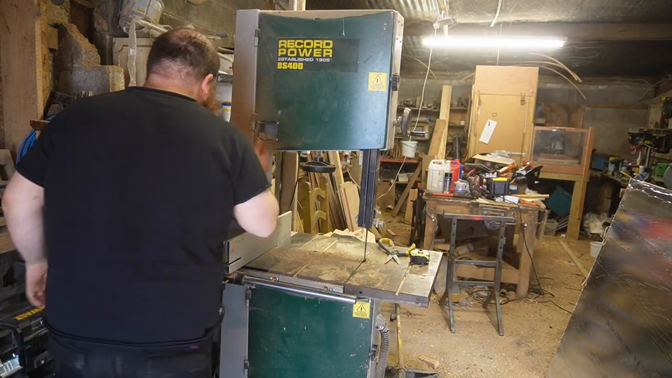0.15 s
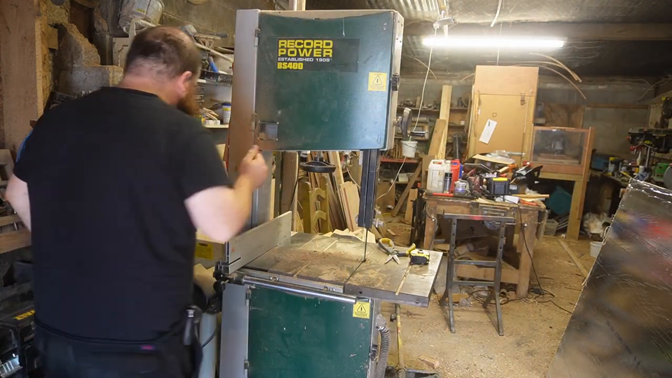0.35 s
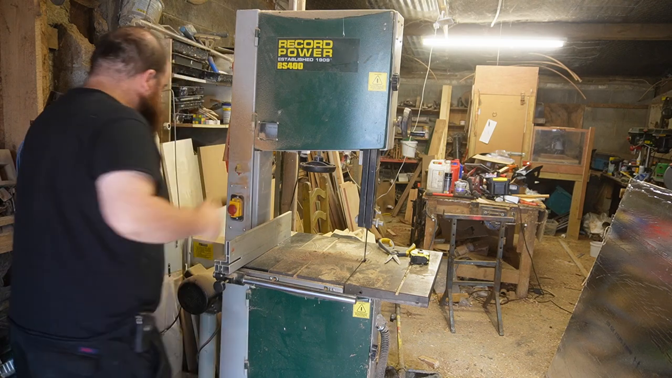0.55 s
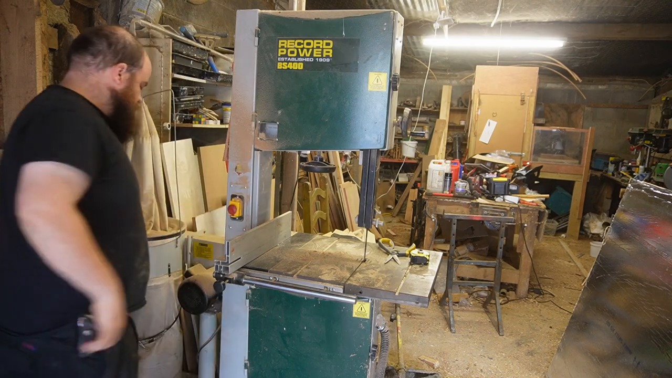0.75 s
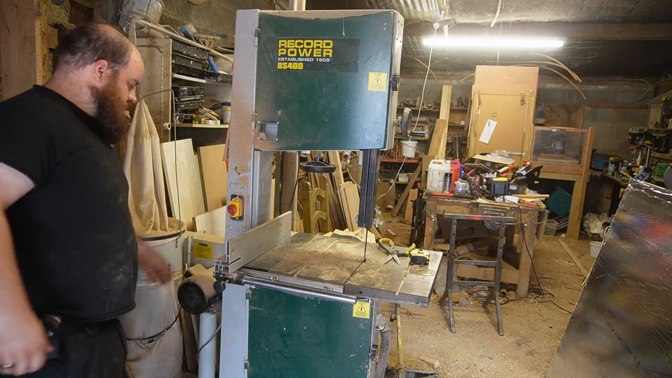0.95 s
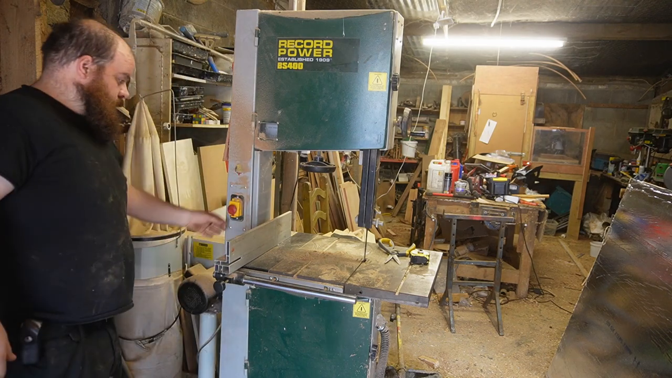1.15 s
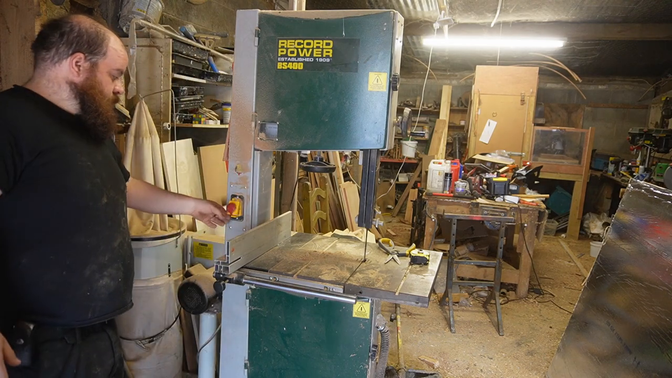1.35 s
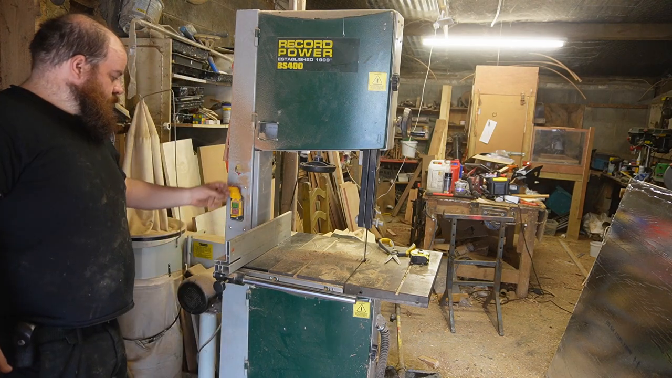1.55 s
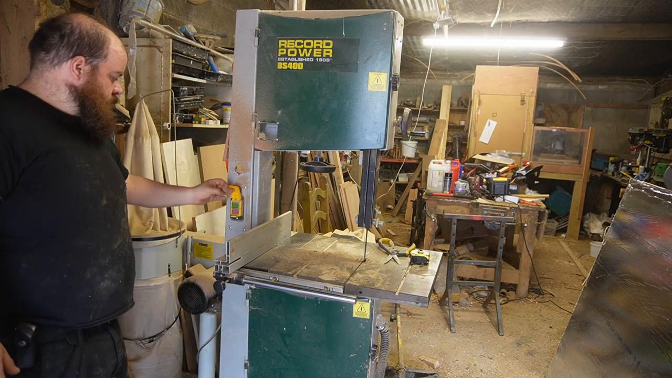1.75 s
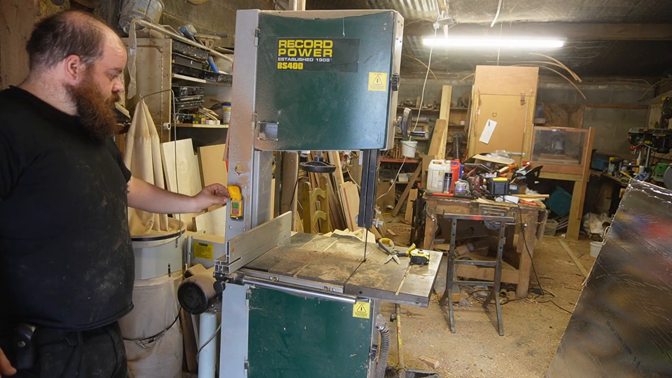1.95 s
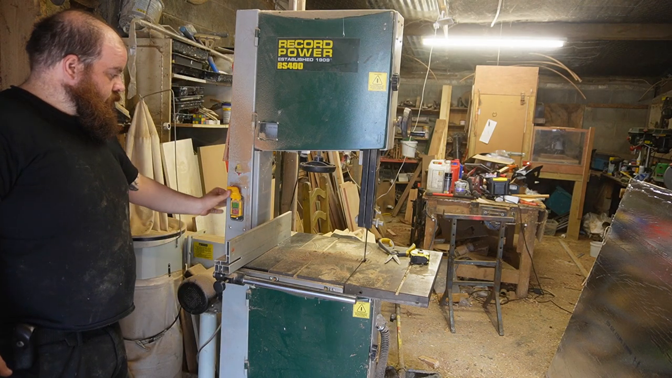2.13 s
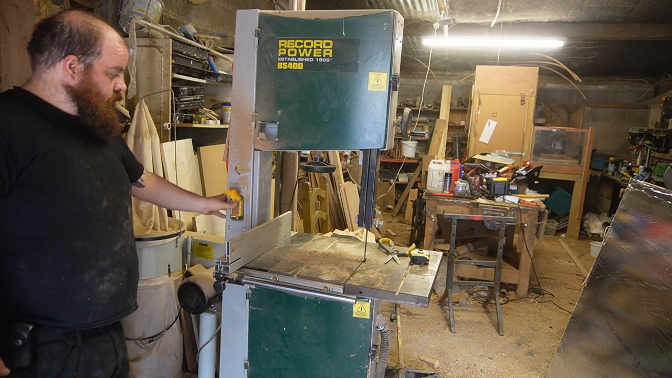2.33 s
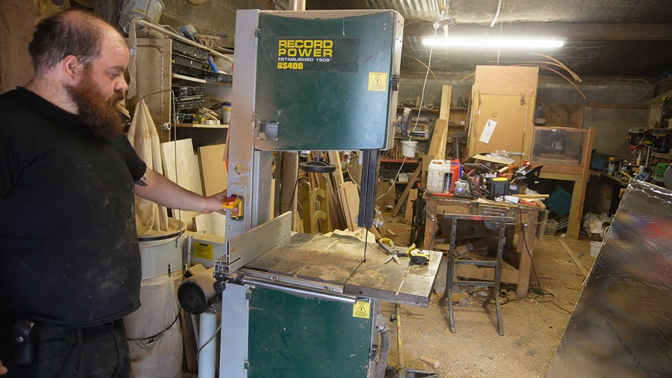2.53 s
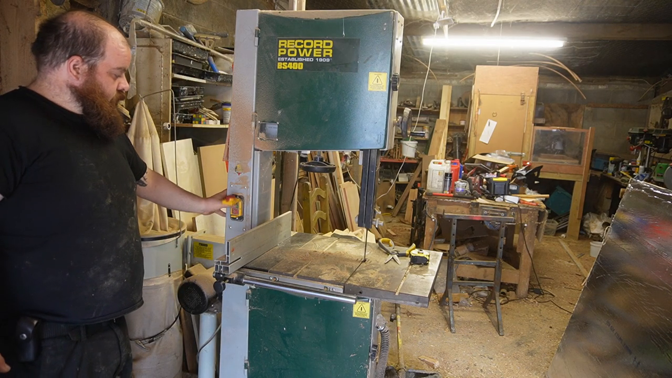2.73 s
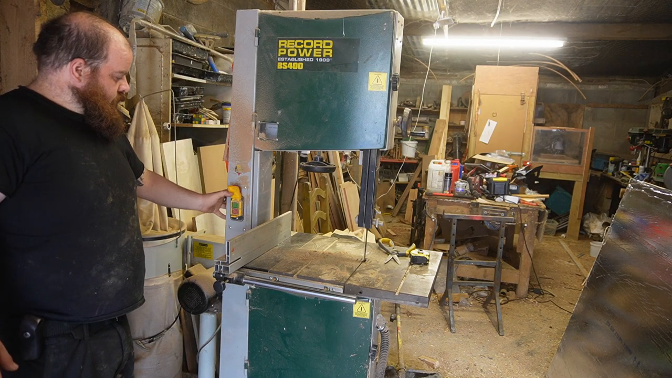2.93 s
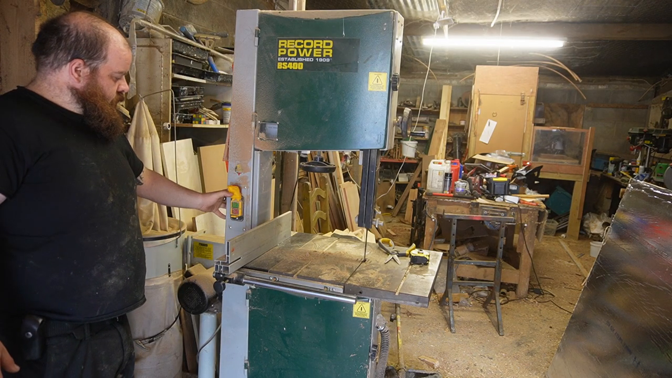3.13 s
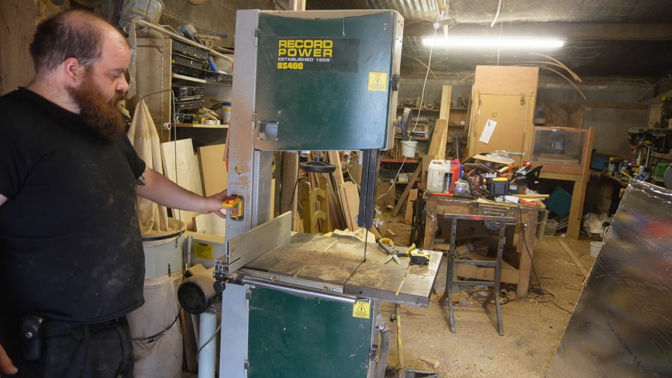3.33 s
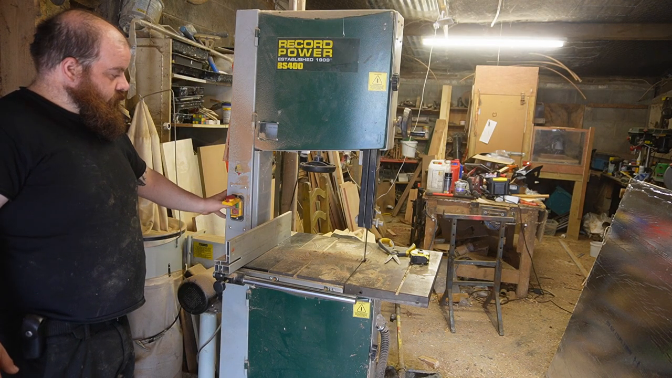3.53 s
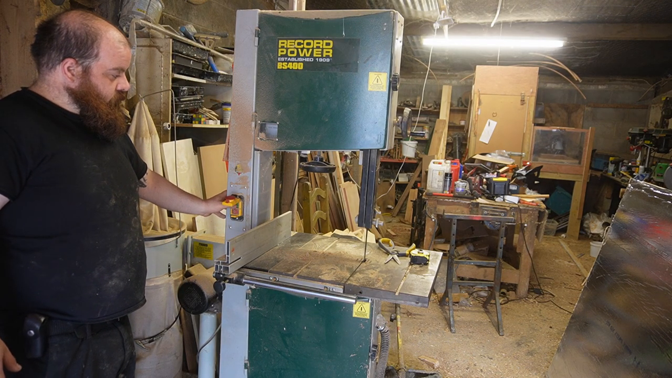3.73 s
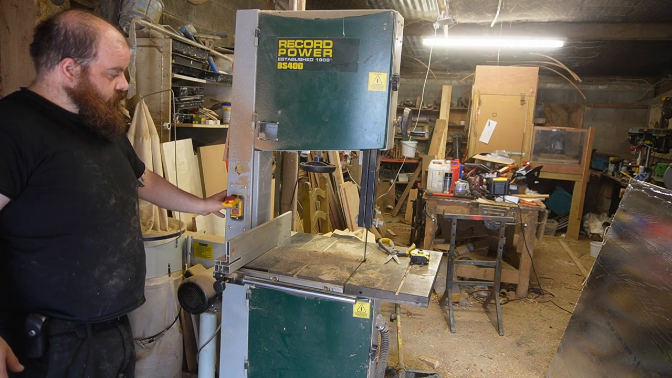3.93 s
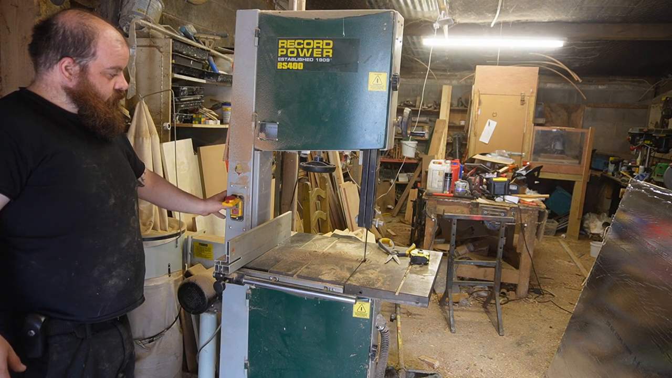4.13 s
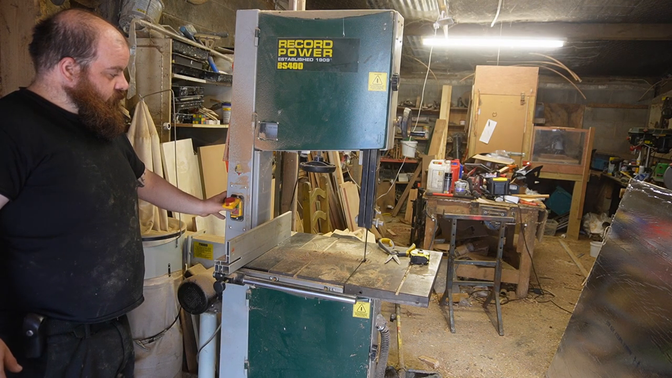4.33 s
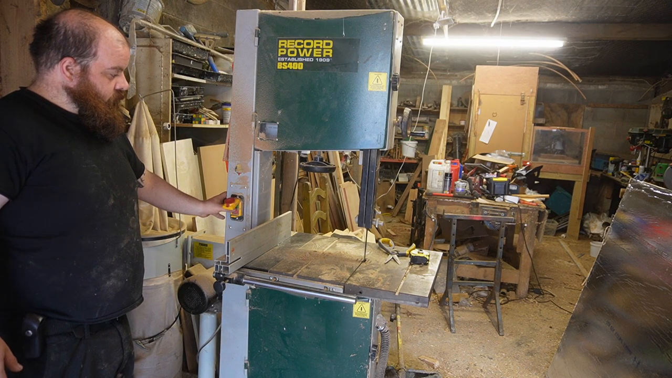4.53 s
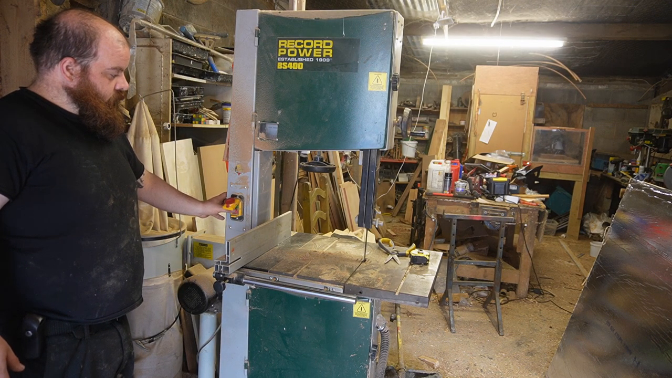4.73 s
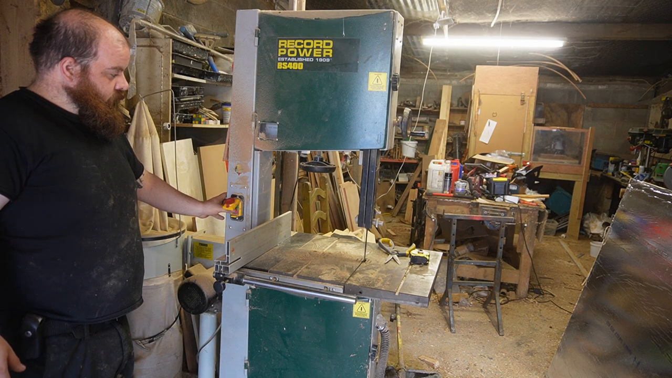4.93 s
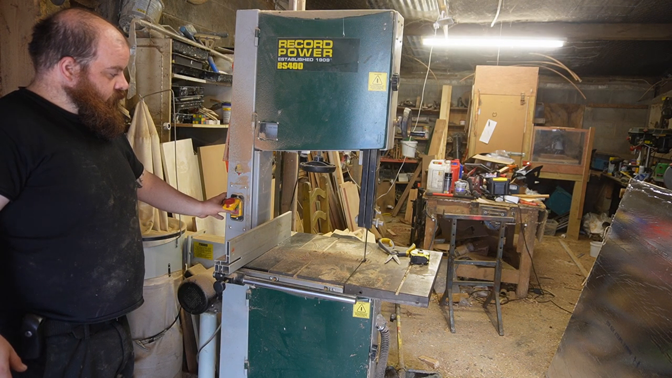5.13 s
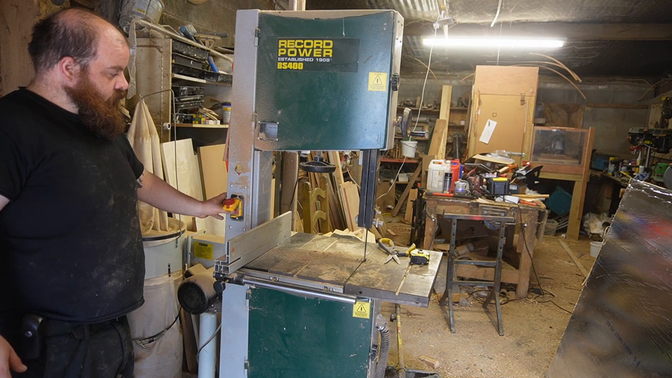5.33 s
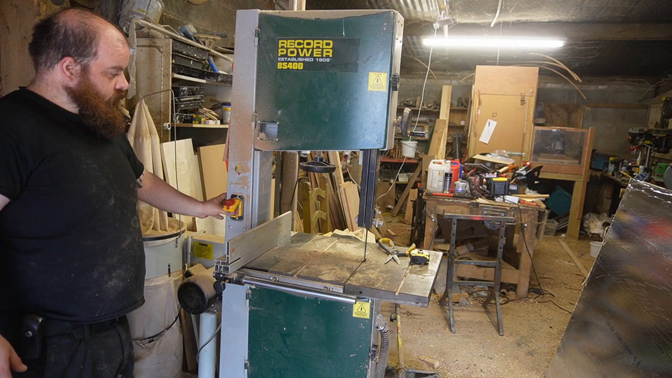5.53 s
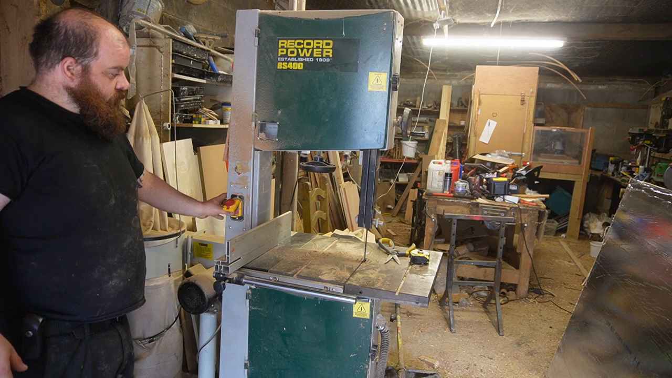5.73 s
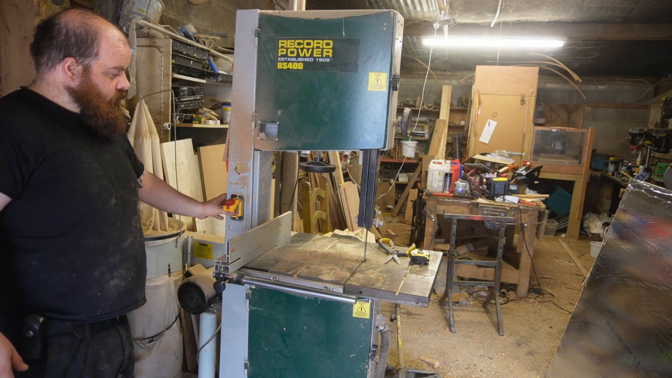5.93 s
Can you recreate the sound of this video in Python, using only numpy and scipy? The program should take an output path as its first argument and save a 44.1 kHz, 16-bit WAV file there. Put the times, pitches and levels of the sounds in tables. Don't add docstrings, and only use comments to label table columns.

```python
import sys
import numpy as np
from scipy import signal
from scipy.fft import rfft, irfft, next_fast_len
from scipy.io import wavfile
from scipy.ndimage import uniform_filter1d

SR = 44100
rng = np.random.default_rng(int(sys.argv[2]) if len(sys.argv) > 2 else 0)


def voltage_ratio(level):
    return 10 ** (np.asarray(level, float) / 20)


def pcm_store(signal):
    levels = np.round(np.clip(np.atleast_2d(signal), -1, 1) * 32767)
    wavfile.write(sys.argv[1], SR, levels.astype(np.int16).T)


N = 263718
TIME = np.arange(N) / SR


def level(x, db):
    return x * voltage_ratio(db) / np.sqrt(np.mean(x ** 2))


def mean_db(x):
    return 10 * np.log10(np.mean(x ** 2))


def colour(x, table):
    hz, db = np.transpose(table)
    size = next_fast_len(len(x))
    log_hz = np.log(np.maximum(np.arange(size // 2 + 1) * SR / size, 1))
    gain = voltage_ratio(np.interp(log_hz, np.log(hz), db))
    return irfft(rfft(x, size) * gain, size)[:len(x)]


def curves(table):
    return np.interp(TIME, *np.transpose(table))


def walk(rate):
    knots = np.repeat(rng.standard_normal(int(N / SR * rate) + 2), 8)
    smooth = uniform_filter1d(uniform_filter1d(knots, size=8), size=8)
    return 1.69 * np.interp(TIME * rate * 8, np.arange(len(knots)), smooth)


def grit(spread_db, size=N):
    strength_db = spread_db * np.minimum(rng.exponential(size=size), 6)
    return level(rng.standard_normal(size) * voltage_ratio(strength_db), 0)


def swell(s, db, rise_db_s, fade_db_s):
    return voltage_ratio(db - np.where(TIME < s, rise_db_s, fade_db_s) * np.abs(TIME - s))


def burst(t60, rise_s):
    t = np.arange(SR // 4) / SR
    return (1 - np.exp(-t / rise_s)) * np.exp(-np.log(1000) * t / np.clip(t60, .01, .6))


def add(out, x, s):
    i = int(s * SR)
    out[i:i + len(x)] += x[:N - i]


def ring(x, hz, width_hz):
    r = np.exp(-np.pi * width_hz / SR)
    return signal.lfilter([1 - r, 0, r - 1], [1, -2 * r * np.cos(2 * np.pi * hz / SR), r * r], x)


def steep(x, hz, width_hz):
    y = ring(ring(x, hz, width_hz), hz, width_hz)
    return y / np.abs(y).max()


def body(x, modes):
    return sum((-1) ** k * voltage_ratio(db) * ring(x, hz, width) for k, (hz, width, db) in enumerate(modes))


def restless(x, modes, swing_db, rate):
    return sum(voltage_ratio(db + swing_db * walk(rate)) * ring(x, hz, width) for hz, width, db in modes)


def sing(lines, swing_db, rate, wander):
    out = np.zeros(N)
    for hz, db in lines:
        phase = 2 * np.pi * (hz * TIME + rng.random()) + wander * walk(rate)
        out += voltage_ratio(db + swing_db * walk(rate)) * np.sin(phase)
    return out


POWER_S, RUN_UP_S = 3.8, 2.275


def speed():
    return np.clip((TIME - POWER_S) / RUN_UP_S, 0, 1)


# (t/s, level/dB)
DRIVE = [(3.86, -40.5), (3.97, -42.5), (4.14, -38.5), (4.31, -39), (4.41, -41), (4.57, -37.5),
         (4.67, -38.5), (4.86, -38), (4.94, -35.5), (5.02, -36.5), (5.24, -34), (5.5, -32), (5.7, -31),
         (5.93, -27), (5.98, -28.5)]
# (f/Hz, width/Hz, level/dB)
CABINET = [(123, 25, -13), (163, 5.1, -17), (351, 40, -3.5), (387, 37, -8), (509, 9.8, -8), (607, 21, -8),
           (658, 9.7, -4), (695, 38, -5), (800, 30, -11.5), (938, 36, -9.5), (1014, 40, -10.5)]
# (f/Hz, level/dB)
RUMBLE = [(24, -61), (40, -40), (144, -12.5), (194, 0), (280, -13), (431, -3.5), (679, -0.5), (1200, -22.5),
          (1560, -4.5), (2640, -120)]
# (peak t/s, level/dB, fade/dB per s)
DRONE = [(4.02, -39, 196), (4.3, -33, 168), (4.59, -39, 259), (4.77, -36, 147), (4.94, -27.5, 360),
         (5.33, -28.5, 152), (5.41, -25.5, 170), (5.52, -43, 150), (5.69, -39, 68)]
# (f/Hz, width/Hz, level/dB)
WHEELS = [(1308, 43, 7), (1460, 14, 10), (1676, 12, -11), (1806, 32, 2), (2095, 42, 4), (2403, 8.6, 7.5),
          (2940, 30, -13)]
# (f/Hz, level/dB)
ROAR = [(410, -45), (700, -8.5), (1140, -24), (1700, 7.5), (2380, -10), (5000, -14), (6500, -78),
        (11000, -120)]
# (f/Hz, width/Hz, level/dB)
BLADE = [(2417, 47, 3.5), (3377, 56, 2), (3730, 90, -4), (4160, 39, -2), (4460, 28, -7.5), (4910, 28, 1),
         (5400, 45, -10), (5860, 29, -4.5), (6580, 60, -5.5)]
# (f/Hz, width/Hz, level/dB)
GUIDE = [(7400, 83, -14), (8090, 80, -12), (8460, 35, 4), (8800, 79, -8), (9430, 79, -3), (9850, 75, -3.5),
         (10280, 56, -9), (11100, 60, -14), (11600, 90, -11), (12600, 39, -14), (12900, 70, -8),
         (13800, 87, -12), (15100, 290, -6)]
# (f/Hz, level/dB)
RUB = [(1470, -22.5), (2500, 0), (2660, -1), (5070, -10), (7250, -18), (8660, -12.5), (12200, -20),
       (16000, -16.5)]
# (f/Hz, level/dB)
WHINE = [(2440, -12), (2632, -17.5), (3418, -14.5), (3467, -13.5), (4317, -8), (4931, -15.5), (5755, -22),
         (6530, -18)]
GRAZE_S, GRAZE_DB_S = 4.4, 30
ROAR_DB, ROAR_RISE_DB = -7.5, 1.5
RUB_DB, RUB_RISE_DB, RUB_SHARE = -75, 44.5, 0.52


def drive():
    live = np.clip((TIME - POWER_S) / 0.04, 0, 1) ** 2
    shake_db = curves(DRIVE)
    cabinet = level(restless(grit(2.6), CABINET, 1.3, 12), -4.5) + level(colour(grit(1.6), RUMBLE), -4.5)
    rumble = live * voltage_ratio(shake_db + 1.5) * cabinet
    panel = sing([(313, -2.5)], 1.0, 12, 0.34)
    drone = live * sum(swell(s, db, fade, fade) for s, db, fade in DRONE) * panel
    wheels = level(restless(grit(4.7), WHEELS, 0.53, 7.6), -7.0) + level(colour(grit(4.5), ROAR), -0.62)
    roar = live * voltage_ratio(shake_db + ROAR_DB + ROAR_RISE_DB * speed()) * wheels
    contact = grit(0.81) * voltage_ratio(1.03 * walk(30))
    blade = level(restless(contact, BLADE, 2.6, 16), -11)
    blade = blade + level(restless(contact, GUIDE, 3.2, 22), -13.5)
    blade = blade + level(colour(contact, RUB), -3)
    blade = blade + voltage_ratio(-6.5) * sing(WHINE, 4.0, 16, 1.2)
    jolts_db = shake_db - uniform_filter1d(shake_db, size=SR // 2)
    rub_db = RUB_DB + RUB_RISE_DB * speed() ** 0.49 + RUB_SHARE * jolts_db
    rub = live * swell(GRAZE_S, 0, GRAZE_DB_S, 0) * voltage_ratio(rub_db) * blade
    return rumble + drone + roar + rub


# (t/s, peak level/dB, scrape t60/s, thin top relative level/dB)
SLAPS = [(4.4794, -38, 0.2, -37), (4.5075, -33, 0.24, -34), (4.808, -43, 0.046, 1),
         (4.91, -36.5, 0.27, -14), (5.0378, -23.5, 0.092, -19), (5.17, -26.5, 0.12, -23),
         (5.209, -25.5, 0.086, -10), (5.2586, -19, 0.18, -32), (5.272, -25, 0.13, -30),
         (5.3775, -25.5, 0.2, -13), (5.4296, -16.5, 0.035, -33), (5.5693, -29.5, 0.29, -11),
         (5.6607, -20, 0.045, -14), (5.8396, -23, 0.16, -19), (5.8796, -20, 0.08, -11),
         (5.926, -23.5, 0.2, -11), (5.963, -14.5, 0.18, -23)]
# (f/Hz, level/dB)
SLAP = [(470, -36), (800, 8.5), (1030, 7), (1180, -3), (3650, 2.5), (6170, -4.5), (8660, -9),
        (16000, -17.5)]
GUIDE_DB = -4


def slaps():
    force, glance = np.zeros((2, N))
    for s, db, t60, top_db in SLAPS:
        scrape = voltage_ratio(db) * grit(1.1, size=SR // 4) * burst(t60, 0.0037)
        add(force, scrape, s - .003)
        add(glance, scrape * voltage_ratio(top_db), s - .003)
    power_db = mean_db(force)
    thin = ring(ring(glance, 13000, 6000), 13000, 6000)
    thin = thin + voltage_ratio(16.0) * body(glance, GUIDE[6:])
    thin = thin + voltage_ratio(4.5) * ring(glance, 15300, 900)
    ringing = body(force, BLADE) + voltage_ratio(GUIDE_DB) * body(force, GUIDE[:7])
    return level(ringing, power_db - 6.0) + level(colour(force, SLAP), power_db - 3) + thin


# (t/s, pitch f/Hz, level/dB)
GUARD = [(4.3, 665, -52), (4.4, 668, -46.5), (4.6, 680, -46), (4.8, 682, -42), (5.0, 670, -50),
         (5.15, 672, -47), (5.225, 686, -34.5), (5.32, 685, -49.5), (5.499, 684, -41.5), (5.599, 662, -46),
         (5.7, 660, -38), (5.801, 665, -48), (5.89, 690, -37), (5.98, 660, -38)]


def guard():
    s, hz, db = np.transpose(GUARD)
    fade_in = np.clip((TIME - s[0]) / 0.089 + 1, 0, 1)
    turns = np.cumsum(np.interp(TIME, s, hz)) / SR
    tone = np.sin(2 * np.pi * turns + .4 * walk(20))
    return np.sqrt(2) * fade_in * voltage_ratio(np.interp(TIME, s, db) + 0.83 * walk(27)) * tone


# (multiple of mains, level under strain/dB, further level once strain has passed/dB)
GROWL = [(2.01, -15, 0), (3.025, -9, 0.5), (4.99, -3.5, -6), (5.99, -7, 2.5), (7.04, 4.5, -9.5),
         (8, -1.5, 2.5), (9.1, -5.5, 2.5), (10.76, -8, -15), (12.01, -7, 5.5), (21.9, -14.5, 9.5),
         (10.05, -11, -6), (25.5, -17, 4)]
# (f/Hz, width/Hz, level/dB)
BUZZ = [(512, 9.1, 1.5), (655, 11, -4), (770, 12, 7), (814, 13, 1), (850, 18, -9), (1020, 36, -2),
        (1064, 34, -3), (1186, 7.6, 0)]
# (f/Hz, level/dB)
SURGE = [(350, -23), (550, -2), (800, 9), (920, 2), (1050, 4), (1400, -2), (2200, -49)]
# (f/Hz, level/dB)
STIR = [(1015, 22), (1064, 24), (5400, -2), (6600, -6), (8100, -5), (8950, -6), (10000, 0)]
MAINS_HZ, DROP_OUT_S = 50.34, 5.1
STRAIN_S, STRAIN_RISE_DB_S, STRAIN_FADE_DB_S = 4.154, 48, 70
GRIP_S, GRIP_FADE_DB_S = 4.25, 350
MAINS_DB, MAINS_SAG_DB, HUM_DB, HUM_RISE_DB = -55.5, -6, -57.5, 18.5
GROWL_DB, GROWL_REST_DB = -42, -49
SURGE_S, SURGE_DB, SURGE_RISE_DB_S, SURGE_FADE_DB_S = 4.2, -38, 73, 23
STIR_S, STIR_DB, STIR_RISE_DB_S, STIR_FADE_DB_S = 4.07, -67, 250, 12


def windings():
    live = np.clip((TIME - POWER_S) / 0.014, 0, 1)
    strain = swell(STRAIN_S, 0, STRAIN_RISE_DB_S, STRAIN_FADE_DB_S)
    grip = swell(GRIP_S, 0, 0, GRIP_FADE_DB_S)
    turn = 2 * np.pi * MAINS_HZ * TIME

    starting = swell(DROP_OUT_S, 0, 0, 120) * np.clip((TIME - POWER_S) / 0.11, 0, 1) ** 2
    shake = voltage_ratio(MAINS_DB + MAINS_SAG_DB * speed() + 1.5 * walk(11.0)) * starting * (1 + 0.94 * strain)
    hum = voltage_ratio(HUM_DB + HUM_RISE_DB * np.minimum(speed() / 0.91, 1) + 0.47 * walk(6.1))
    hum = live * (hum + swell(POWER_S, -36.0, 0, 360) + swell(5.3, -43.0, 195, 200))
    rest_growl = voltage_ratio(GROWL_REST_DB + 0.23 * (curves(DRIVE) + 35.5) + 1.8 * walk(8))
    growl = live * (voltage_ratio(GROWL_DB) * strain + rest_growl)

    eased = 1 - np.sqrt(strain)
    stack = np.zeros(N)
    for k, db, rest_db in GROWL:
        order_db = db + rest_db * eased + (0.44 + 2.15 * eased) * walk(9)
        phase = k * turn + 2 * np.pi * rng.random() + .012 * k * walk(11)
        stack += voltage_ratio(order_db) * np.sin(phase)
    strain_db = np.maximum(20 * np.log10(strain) - 3, -25)
    stack = stack + grip * voltage_ratio(strain_db) * level(restless(grit(1.2), BUZZ, 3.0, 14), 3.2)

    stir = swell(STIR_S, STIR_DB, STIR_RISE_DB_S, STIR_FADE_DB_S) * np.sqrt(grip)
    stir = stir * sing(STIR, 2.7, 25, 0.73)
    surge = live * swell(SURGE_S, SURGE_DB, SURGE_RISE_DB_S, SURGE_FADE_DB_S) * grip
    surge = surge * level(colour(grit(2.4), SURGE), 0)
    tones = shake * np.sin(turn) + hum * np.sin(4 * turn + 0.056 * walk(9.1)) + growl * stack
    return np.sqrt(2) * tones + surge + stir


# (f/Hz, level/dB, t60/s)
CONTACTOR = [(2190, 0.5, 0.23), (2720, 1, 0.22), (2920, -2, 0.24), (3650, 8, 0.34), (3750, 2, 0.25),
             (3820, 10, 0.57), (3950, 7.5, 0.13), (3980, 6, 0.38), (4170, -3, 0.27), (4480, 2, 0.22),
             (4780, -4, 0.12), (5200, 3, 0.12), (6450, -10, 0.21), (8670, -5, 0.33)]
# (f/Hz, level/dB)
CLANK = [(100, -23), (315, -8), (570, -14), (910, -29), (1480, -5), (1870, -15), (3860, -8), (7290, -29),
         (9820, -22), (16000, -59)]
# (f/Hz, level/dB)
LID = [(1417, -13), (1460, -8), (1534, 1.5), (1608, -6), (1655, -10)]
# (t/s, level/dB, fade/dB per s)
LID_BLOWS = [
    (3.779, -39, 104),
    (3.797, -25.5, 400),
    (3.82, -14.5, 700),
    (3.852, -40, 200),
]
# (f/Hz, level/dB)
BOX = [(2171, -8), (2936, -4), (3602, -8), (3770, -7), (3841, -1), (4020, 0), (4194, -5), (4496, -7),
       (6800, -11), (8720, -8)]
BOX_DB, BOX_PEAK_S, BOX_FADE_DB_S = -36, 3.815, 174
TOUCH_S, TOUCH_DB, TOUCH_FADE_DB_S = 3.767, -25.5, 898
SEAT_S, SEAT_DB, SEAT_SAG_DB_S = 3.778, -17.5, 75
SETTLE_S, SETTLE_DB_S = 3.846, 450


def contactor():
    seated = swell(SEAT_S, SEAT_DB, 5000, SEAT_SAG_DB_S) * swell(SETTLE_S, 0, 0, SETTLE_DB_S)
    bounce = swell(TOUCH_S, TOUCH_DB, 16600, TOUCH_FADE_DB_S) + seated
    chatter = grit(0.58) * voltage_ratio(1.4 * walk(220)) * bounce
    power_db = mean_db(chatter)
    box = level(body(chatter, [(hz, 21.0 / t60, db) for hz, db, t60 in CONTACTOR]), power_db - 2.0)
    clank = level(colour(chatter, CLANK), power_db - 0.5)
    lid = sum(swell(s, db, 1700, fade) for s, db, fade in LID_BLOWS) * sing(LID, 1.0, 50, 0.26)
    box_ring = (TIME > SEAT_S) * swell(BOX_PEAK_S, BOX_DB, 120, BOX_FADE_DB_S) * sing(BOX, 2.1, 45, 0.52)
    return box + clank + lid + box_ring


def snap(events, spectrum, modes, ring_db):
    out = np.zeros(N)
    start_s = max(events[0][0] - .004, 0)
    force = np.zeros(int((events[-1][0] - start_s + .4) * SR))
    for s, db, t60 in events:
        add(force, voltage_ratio(db) * grit(0.89, size=SR // 4) * burst(t60, 0.0002), s - .001 - start_s)
    power_db = mean_db(force)
    crack = level(colour(force, spectrum), power_db - 8.0)
    add(out, crack + level(body(force, modes), power_db + ring_db), start_s)
    return out


# rattles (t/s, peak level/dB, t60/s), spectrum (f/Hz, level/dB),
# modes (f/Hz, width/Hz, level/dB) and the level of the modes/dB.
CATCH = ([(0.009, -23, 0.052), (.0144, -23, .1)], [(300, -23), (2500, -4.5), (5000, -8), (16000, -28.5)],
          [(2360, 70, 1), (2740, 110, 2), (4200, 67, 0.5), (4730, 70, 0), (5260, 80, -4), (6410, 90, -4)],
          -7.5)
LATCH = ([(0.1195, -12.5, -0.06), (0.1225, -4.5, 0), (0.1275, -2.5, 0.03), (0.1395, -12, -0.12),
          (0.146, -23, -0.33), (0.152, -21, -0.12), (0.163, -29.5, 0.4)], [(150, -31), (545, -1),
          (1790, -7.5), (2400, 1), (3350, -5.5), (4240, -4.5), (11700, -25), (16000, -38)],
          [(566, 120, 0.5), (830, 89, -14), (2210, 240, 2), (4040, 77, -12), (4180, 180, 1), (5480, 83, -1),
          (6280, 98, -3), (7500, 100, -6)], -8)
HINGE = ([(1.9415, -24.5, 0.019), (1.9514, -39, 0.017), (1.99, -49, .06), (2.0378, -35.5, 0.033)],
          [(880, -54), (1500, -24), (5830, -6), (10800, -37), (11300, -45), (15100, -33), (16000, -66)],
          [(2740, 60, 2), (4100, 71, 18), (4740, 78, 6.8), (5230, 49, 19), (5930, 22, 7.9), (6640, 40, 6),
          (7250, 43, 4), (7600, 40, 3)], -5.5)
FLIP = ([(2.1025, -32, 0.045), (2.108, -32, 0.12)], [(150, -32), (800, -2), (2140, -1), (4300, -2),
         (7200, -13), (12000, -24), (16000, -32)], [(545, 35, 8), (1390, 130, -15), (2130, 50, -8),
         (3200, 70, -3), (4300, 99, 10), (6630, 60, -6), (7100, 90, 2)], -10)
COVER = ([(2.8825, -12, 0.02), (2.8878, -10.5, 0.017), (2.894, -22, 0.08), (2.9, -28, 0.25),
          (2.909, -41, 0.059)], [(150, -21), (800, -7), (1310, -15), (1500, -1), (2020, -6), (5570, -3.5),
          (14800, -30), (16000, -26)], [(455, 73, 1), (800, 170, 8.5), (1612, 86, 0), (2350, 50, -2),
          (2680, 91, -3), (3360, 92, -25), (4160, 99, -11), (4860, 90, -11), (5630, 88, -21)], -9.5)
CRACK = ([(2.1025, -42, .012), (2.8825, -27, 0.014), (2.8878, -26, .02), (3.766, -26, .02),
          (3.78, -27, .05), (3.82, -39, 0.26)], [(2000, -40), (7000, -8), (11000, -6), (16000, -2)],
          [(9000, 900, 0), (13800, 1200, 3)], -7)


def snaps():
    return sum(snap(*part) for part in (CATCH, LATCH, HINGE, FLIP, COVER, CRACK))


def knock(clack_db, thud_db, tick_db, thud_hz, clack_hz):
    contact = grit(2.9, size=SR // 4)
    slow, quick = contact * burst(0.12, 0.004), contact * burst(0.09, 0.0012)
    thud = steep(slow, thud_hz, 224) + 0.7 * steep(slow, 490, 250) + 0.54 * steep(slow, 904, 220)
    clack = steep(slow, clack_hz, 740) + 1.97 * steep(quick, 1590, 2350)
    tick = steep(quick, 2970, 3300) + 0.12 * steep(quick, 10400, 8000)
    return voltage_ratio(thud_db - 7.0) * thud + voltage_ratio(clack_db - 7.5) * clack + voltage_ratio(tick_db + 2.5) * tick


# (t/s, clack peak level/dB, thud relative level/dB, thud f/Hz)
DOOR = [
    (0.008, -26, -7.5, 355),
    (0.065, -27.5, -3, 900),
    (0.1395, -27.5, 8, 800),
    (0.1655, -46, -3, 870),
    (0.2384, -30, 6, 1040),
    (0.265, -23.5, -13, 546),
    (0.383, -29, -18, 517),
]
DOOR_CLACK_HZ, DOOR_TICK_DB = 2580, -5
# (t/s, clack peak level/dB, thud relative level/dB, clack f/Hz)
STEPS = [(0.586, -31.5, -6.5, 1340), (0.598, -22, -11.5, 2360), (0.621, -28, -4, 1700),
         (0.643, -32.5, -0.5, 1440), (0.7254, -29, -2, 1750), (0.738, -33, 4, 2230),
         (0.756, -31, -1.5, 1500), (0.7753, -24, -5, 1440), (0.8298, -36, 4, 1530), (0.87, -50.5, 15, 1120),
         (0.905, -38, 5.5, 1870), (1.076, -36.5, -0.5, 1080), (1.1383, -41.5, 2.5, 1110),
         (1.1833, -34, -10, 1730), (1.23, -37, -5, 1790), (1.5035, -41, -8, 2580)]
STEP_THUD_HZ, STEP_SINK_HZ, STEP_TICK_DB = 514, 110, -17
# (t/s, thud peak level/dB, tick relative level/dB, thud f/Hz)
FINGERS = [(1.6501, -24, -29, 760), (1.6646, -34, -8.5, 830), (1.6986, -46.5, 6, 800),
           (1.7206, -43.5, -14, 530), (1.9838, -44.5, 5, 524), (2.1044, -34.5, 2, 540),
           (2.2469, -33, -21, 800), (2.4703, -40.5, -18, 410), (2.549, -51, -21, 493),
           (3.3292, -46, -20, 410), (3.3894, -60, -19, 380), (3.7574, -31, -36, 536),
           (3.7673, -16, 0.5, 737)]
FINGER_CLACK_HZ, FINGER_CLACK_DB = 2310, -10.5


def knocks():
    out = np.zeros(N)
    for s, db, thud_db, hz in DOOR:
        add(out, knock(db, db + thud_db, db + DOOR_TICK_DB, hz, DOOR_CLACK_HZ), s - .002)
    for s, db, thud_db, hz in STEPS:
        sink = np.sin(np.pi * np.clip((s - .7) / 0.38, 0, 1))
        thud_hz = STEP_THUD_HZ - STEP_SINK_HZ * sink
        add(out, knock(db, db + thud_db, db + STEP_TICK_DB, thud_hz, hz), s - .002)
    for s, db, tick_db, hz in FINGERS:
        add(out, knock(db + FINGER_CLACK_DB, db, db + tick_db, hz, FINGER_CLACK_HZ), s - .002)
    return out


# (peak t/s, level/dB, f/Hz, t60/s)
SQUEAKS = [
    (.85, -46, 13800, 0.1),
    (1.184, -30, 1753, 0.064),
    (2.245, -59, 8300, .03),
]


def squeak():
    out = np.zeros(N)
    for s, db, hz, t60 in SQUEAKS:
        add(out, voltage_ratio(db) * steep(grit(0, size=SR // 4) * burst(t60, 0.003), hz, 0.088 * hz), s)
    return out


# (peak t/s, soles level/dB, cloth level/dB, fade/dB per s)
SCUFF = [(0.19, -31, -36, 80), (0.29, -45, -31.5, 73.5), (0.764, -32.5, -38.5, 138), (0.91, -58, -50, 255),
         (1.2, -46.5, -58, 51.5), (1.7, -54, -58.5, 21), (2.25, -53, -60.5, 36), (2.47, -63, -59.5, 59),
         (3.0, -44, -63, 147), (3.35, -60, -65.5, 52), (3.58, -67, -56, 49)]
# (f/Hz, level/dB)
SOLES_COLOUR = [(60, -14.5), (114, -13.5), (151, 1.5), (295, -9.5), (361, -1.5), (788, -9.5), (2500, -15),
                (3250, -87)]
# (f/Hz, level/dB)
CLOTH_COLOUR = [(1470, -12.5), (2500, -4.5), (5610, -7.5), (6200, -10.5), (7710, -13), (14700, -24),
                (16000, -29.5)]
BRUSH_S, BRUSH_DB, BRUSH_RISE_DB_S = 2.875, -46, 314


def scuff():
    low = sum(swell(s, db, fade, fade) for s, db, _, fade in SCUFF)
    high = sum(swell(s, db, fade, fade) for s, _, db, fade in SCUFF)
    high = high + swell(BRUSH_S, BRUSH_DB, BRUSH_RISE_DB_S, 3000)
    soles = level(colour(grit(1.6), SOLES_COLOUR), -5.5) * voltage_ratio(1.6 * walk(18))
    cloth = level(colour(grit(3.8), CLOTH_COLOUR), -6.0) * voltage_ratio(2.0 * walk(26.12))
    return low * soles + high * cloth


# (peak t/s, level/dB, rise/dB per s, fade/dB per s)
RUSTLE = [(0.976, -53.5, 305, 400), (1.03, -63, 100, 91), (1.095, -58, 600, 196), (1.22, -53, 194, 209),
          (1.29, -73, 148, 300), (1.505, -56, 9000, 350), (1.585, -67, 200, 203), (3.15, -67, 60, 60),
          (3.68, -68, 80, 102)]
# (f/Hz, level/dB)
RUSTLE_COLOUR = [(1200, -14), (3500, 3.5), (7000, -8), (11000, -13), (16000, -20)]


def rustle():
    return sum(swell(*row) for row in RUSTLE) * level(colour(grit(2.4), RUSTLE_COLOUR), 0)


# (peak t/s, level/dB, rise/dB per s, fade/dB per s)
CREAKS = [
    (1.82, -65, 150, 198),
    (1.91, -60, 150, 161),
    (2.0, -57.5, 200, 100),
]
# (f/Hz, width/Hz, level/dB)
CREAK = [(4250, 150, 2), (5160, 140, -2), (7360, 97, -3), (7900, 54, -14)]


def creak():
    force = sum(swell(*row) for row in CREAKS)
    return force * level(restless(grit(3.2), CREAK, 2.2, 39.3), 0)


# (f/Hz, level/dB)
SHOP = [(20, -30.5), (45, -6.5), (263, 0), (301, -6), (363, 1.5), (427, -7), (1160, -12), (1610, -14.5),
        (4250, -23), (16000, -63)]
SHOP_DB = -55.5


def shop_air(db):
    return level(colour(rng.standard_normal(N), SHOP), SHOP_DB + db)


def even(response):
    spectrum = rfft(response)
    power = np.abs(spectrum) ** 2
    ripple = uniform_filter1d(power, size=20) / uniform_filter1d(power, size=300)
    return irfft(spectrum / np.sqrt(ripple), len(response)) * np.linspace(1, 0, len(response)) ** 2


ROOM_T60_S, BASS_T60_S, ROOM_DB = 0.11, 0.46, -5


def room(x, direct):
    t = np.arange(SR // 2) / SR
    echoes = rng.standard_normal(len(t)) * np.clip((t - .003) / 0.0012, 0, 1)
    tail = ring(echoes, 1500, 11400) * np.exp(-np.log(1000) * t / ROOM_T60_S)
    tail = tail + 0.59 * ring(echoes, 570, 1900) * np.exp(-np.log(1000) * t / BASS_T60_S)
    tail = voltage_ratio(ROOM_DB) * tail / np.sqrt(np.sum(tail ** 2))
    response = even(tail + direct * (t == 0))
    return signal.fftconvolve(x, response)[:N] / np.sqrt(direct + voltage_ratio(2 * ROOM_DB))


# (f/Hz, level/dB)
WIDTH = [(30, -36), (60, -29), (200, -25), (380, -25), (1290, -18), (2380, -13.5), (4400, -11), (8120, -7),
         (12000, -1), (15000, 4.5)]


def scene():
    handled = knocks() + squeak() + scuff() + rustle() + creak() + snaps()
    no_bass = signal.butter(2, 110, "high", fs=SR, output="sos")
    light = signal.sosfilt(no_bass, handled + contactor())
    dry = light + drive() + guard() + slaps()
    mid = room(dry, 0.96) + windings() + shop_air(-5.0)
    side = colour(room(dry, 0) + shop_air(11.0), WIDTH)
    side = side + 0.11 * ring(handled, 600, 2900)
    return np.array([mid + side, mid - side])


def band_limit(x):
    return signal.sosfilt(signal.butter(12, 16000, fs=SR, output="sos"), x)


def record(dry):
    hiss = voltage_ratio(-76) * np.diff(rng.standard_normal((2, N + 1)))
    soft = np.tanh(1.453 * (dry + hiss)) / 1.335
    top_cut = signal.ellip(10, .2, 60, 15740, fs=SR, output="sos")
    mix = signal.sosfiltfilt(top_cut, soft)
    return band_limit(mix)


dry = scene()
out = record(dry)
pcm_store(out)
```